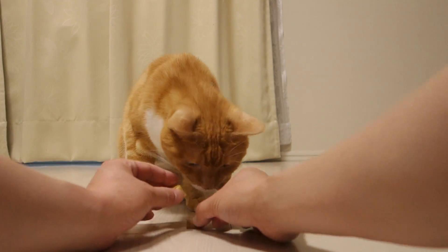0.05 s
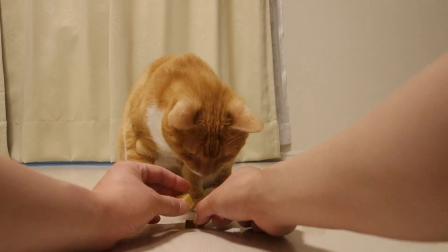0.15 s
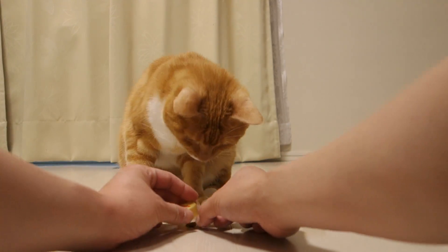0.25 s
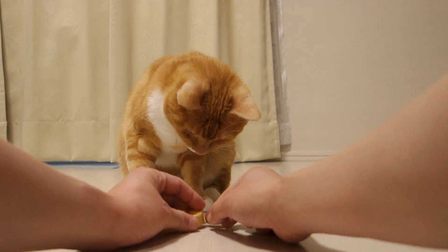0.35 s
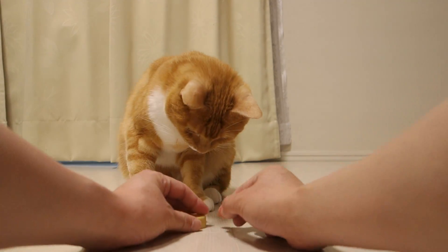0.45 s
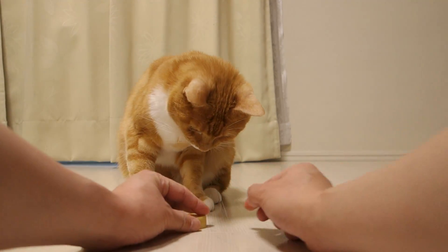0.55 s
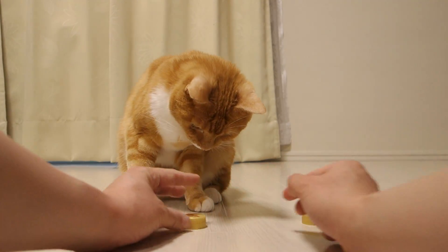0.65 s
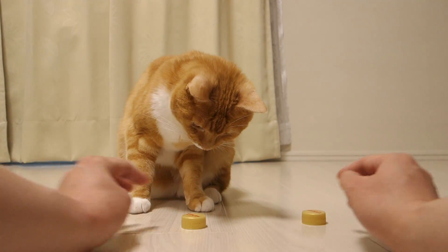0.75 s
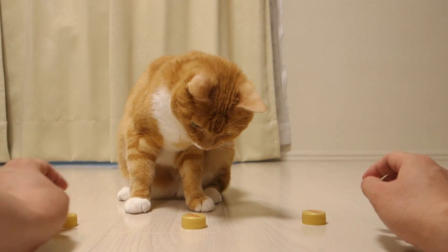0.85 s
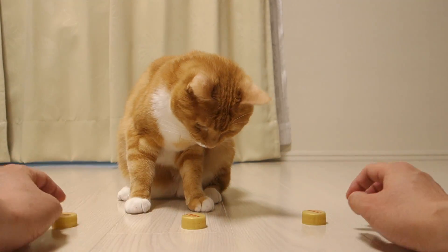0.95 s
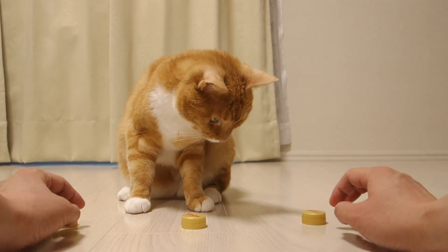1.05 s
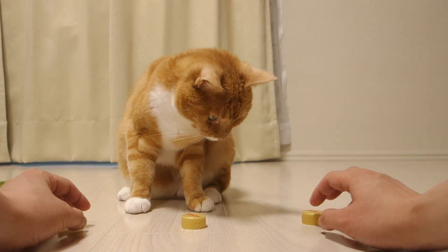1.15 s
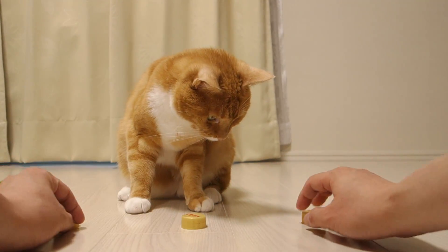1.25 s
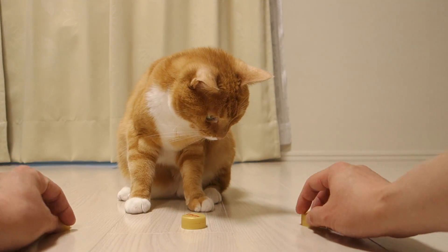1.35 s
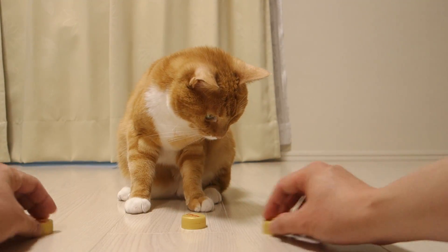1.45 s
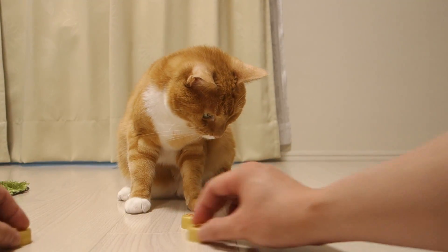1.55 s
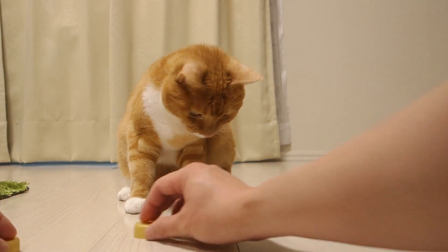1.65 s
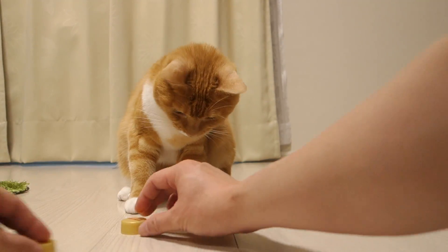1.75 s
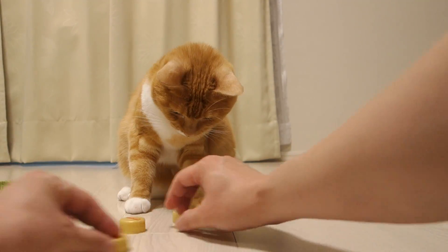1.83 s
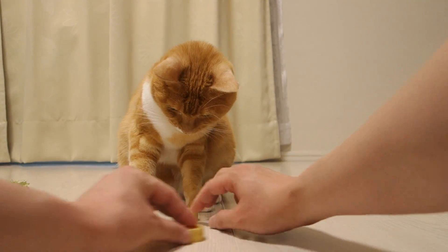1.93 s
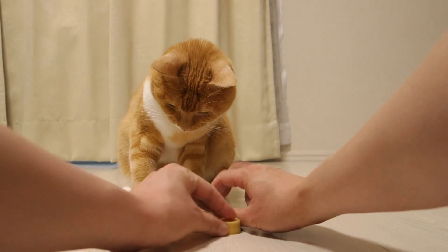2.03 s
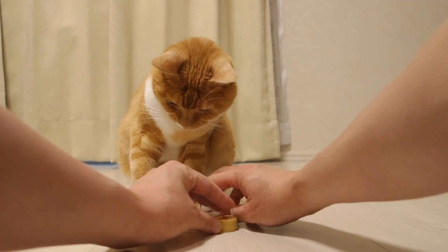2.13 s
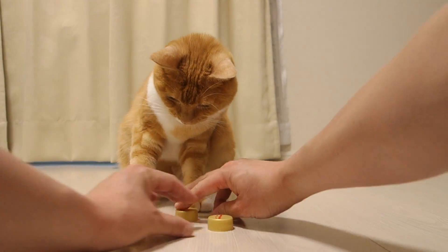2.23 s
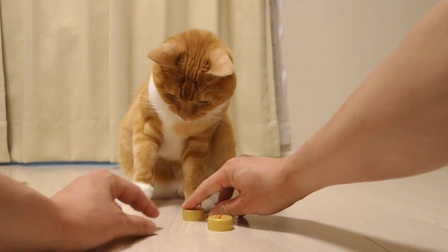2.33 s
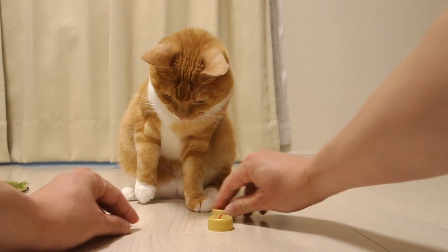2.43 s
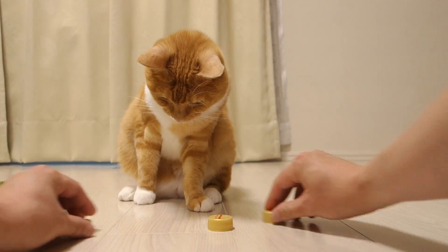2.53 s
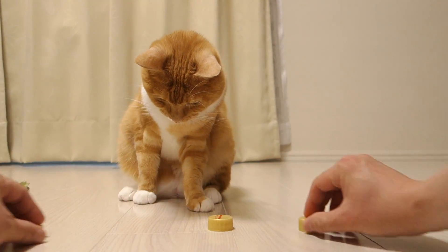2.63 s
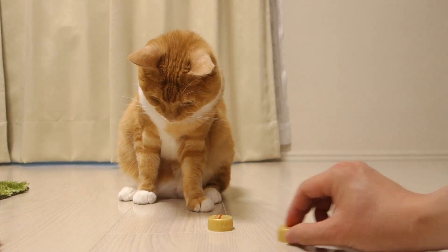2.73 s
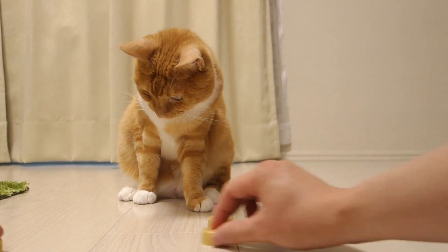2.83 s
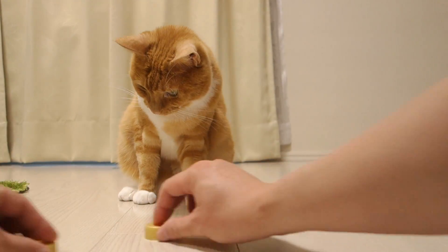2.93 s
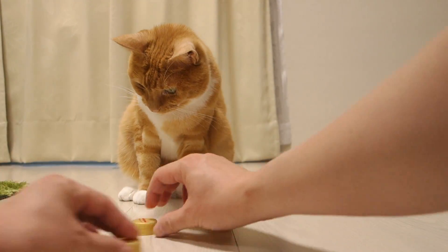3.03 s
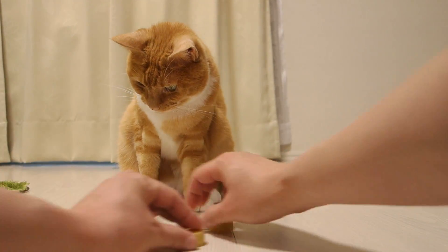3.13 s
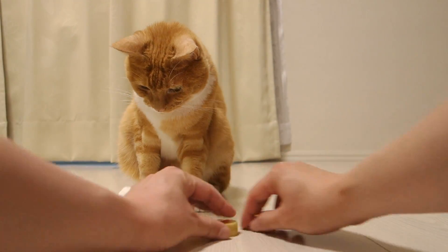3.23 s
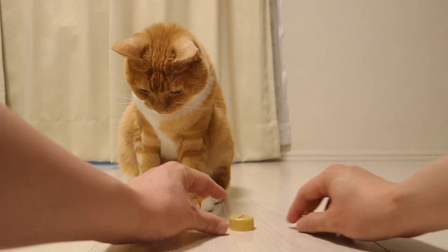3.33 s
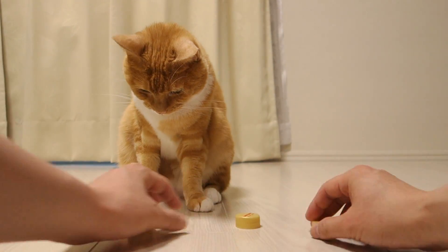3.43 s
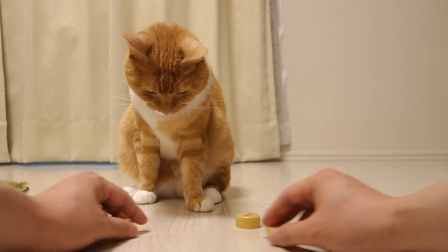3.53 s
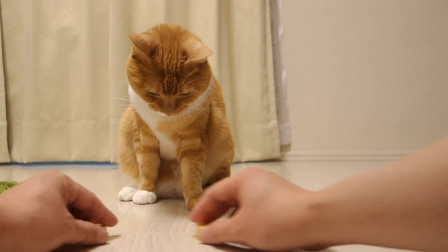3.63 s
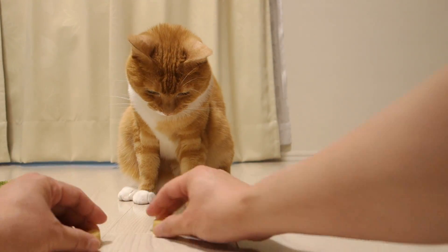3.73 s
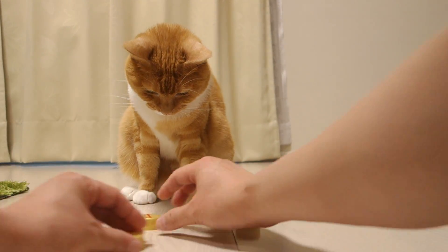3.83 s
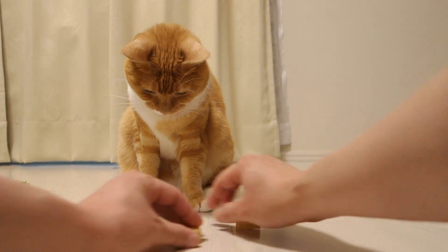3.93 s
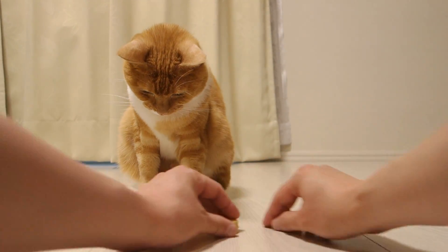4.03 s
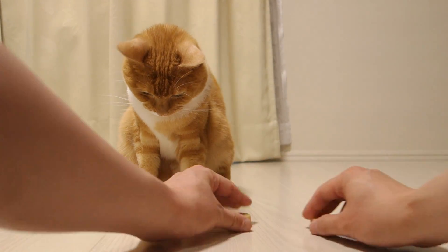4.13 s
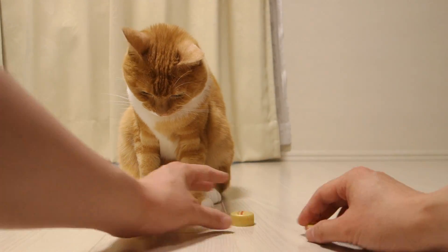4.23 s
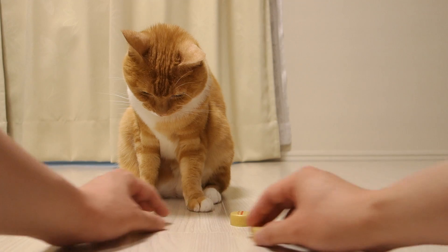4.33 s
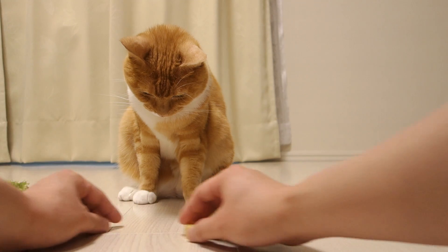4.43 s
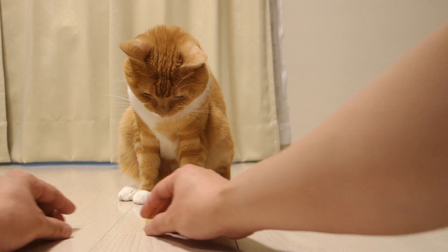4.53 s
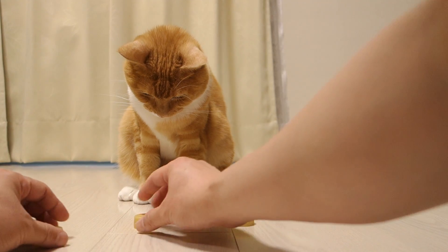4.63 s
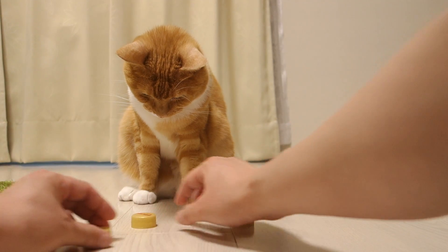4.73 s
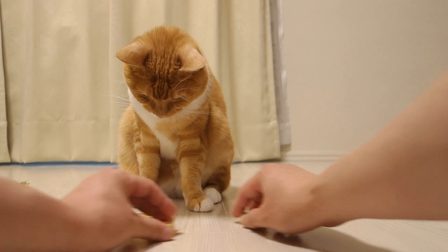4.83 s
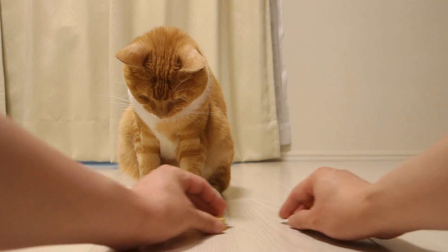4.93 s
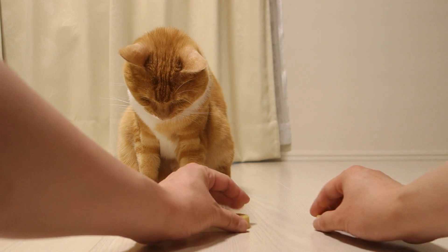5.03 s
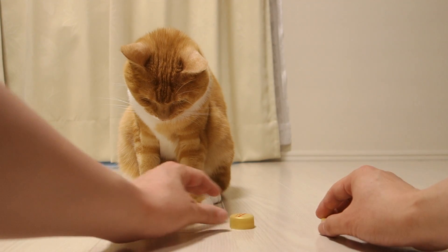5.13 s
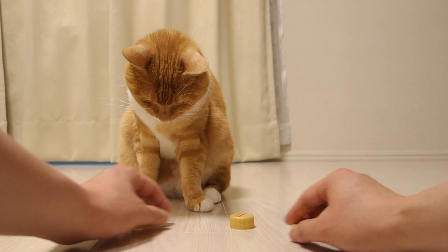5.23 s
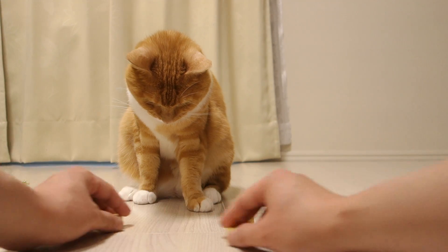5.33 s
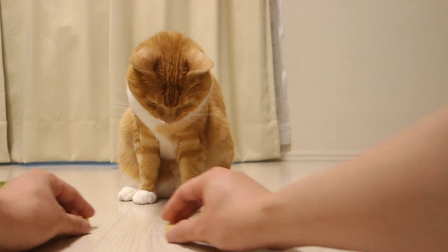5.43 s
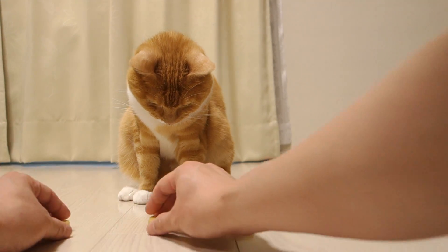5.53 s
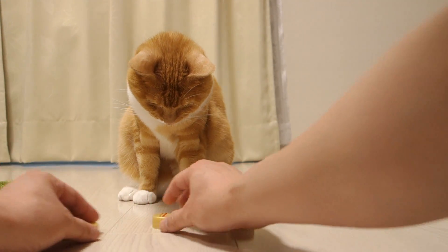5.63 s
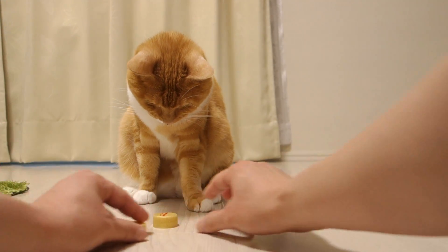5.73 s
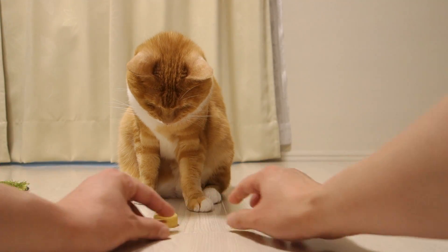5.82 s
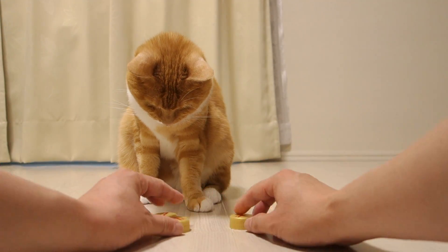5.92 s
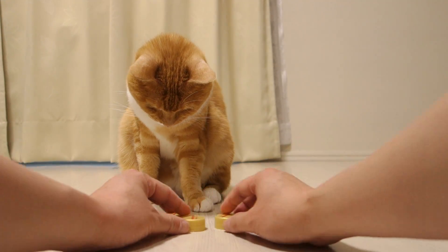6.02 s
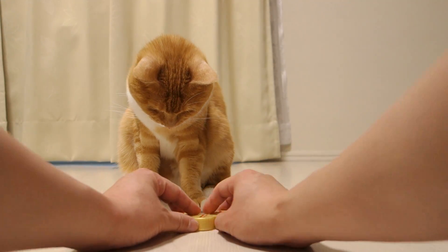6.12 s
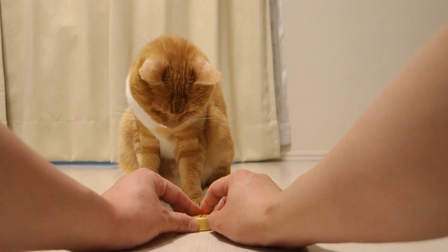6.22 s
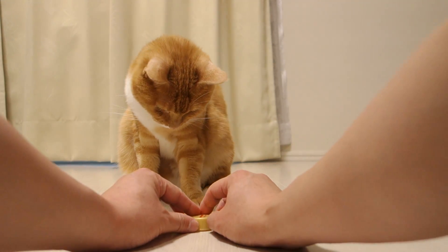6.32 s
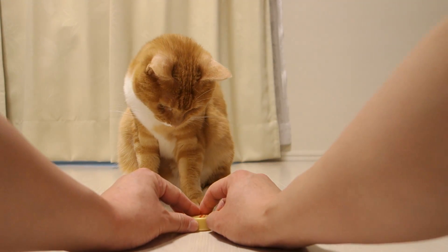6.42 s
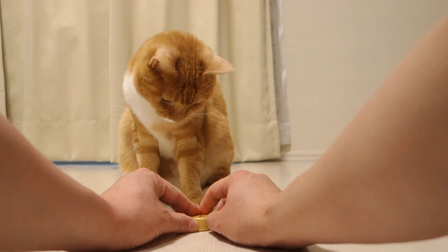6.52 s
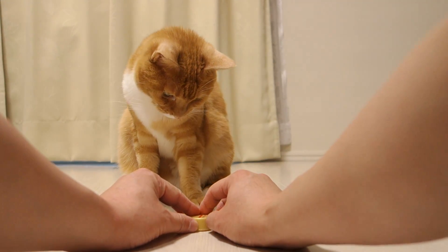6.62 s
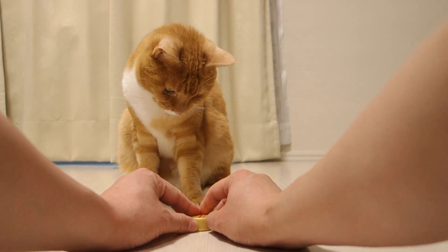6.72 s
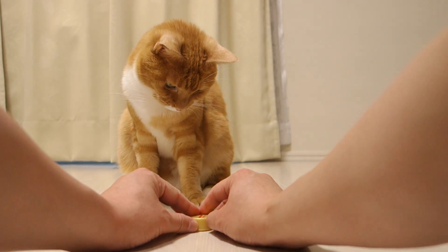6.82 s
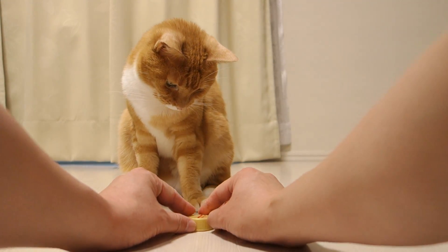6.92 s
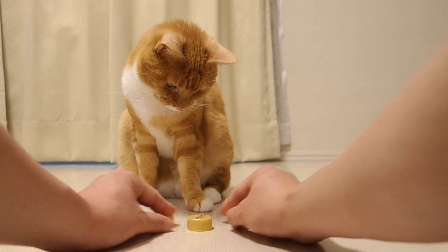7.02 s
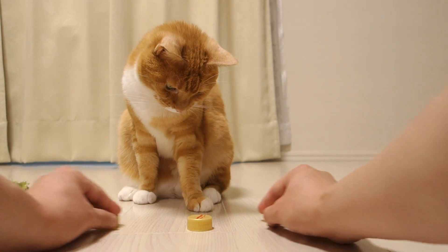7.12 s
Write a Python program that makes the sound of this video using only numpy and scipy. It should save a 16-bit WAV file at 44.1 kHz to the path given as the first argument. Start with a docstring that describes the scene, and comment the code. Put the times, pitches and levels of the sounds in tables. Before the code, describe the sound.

Close, slightly right of centre: plastic bottle caps rubbed over floorboards in quick back-and-forth strokes, each a gritty, nasal scrape that swells and fades, peppered with light knocks as caps catch or are set down. The opening is nearly silent, just tiny ticks and hand hiss; the shuffling then runs almost unbroken until a near pause before the end. Small room, short echoes, faint low engine drone far off.

```python
"""A small quiet room, microphone close: two hands shuffle three plastic bottle caps over a wooden floor.
First faint ticks and empty hands hissing over the boards; from 1.5 s friction rings the caps in strokes,
with ticks as they catch or are set down and dull bumps of the heel of a hand, until the last stroke at 7 s.
The fingers grip loosely, firmly from 2.35 s, lightly from 3.48 s. Each grip filters the friction noise.
Behind it all: filtered room noise, a sine hum, and a far two-sine engine drone that steps down near 2.6 s."""
import sys
import numpy as np
from scipy import signal
from scipy.fft import rfft, irfft, next_fast_len
from scipy.io import wavfile
from scipy.ndimage import uniform_filter1d

SR = 44100
rng = np.random.default_rng(int(sys.argv[2]) if len(sys.argv) > 2 else 0)


def waveform_to_disk(signal):
    """Save audio, clipped to [-1, 1], as 16-bit WAV at the path in sys.argv[1]."""
    frames = np.transpose(np.atleast_2d(signal))
    scaled = np.clip(frames, -1, 1) * 32767
    samples = np.round(scaled).astype(np.int16)
    wavfile.write(sys.argv[1], SR, samples)


N = 316197
T = np.arange(N) / SR

# Strokes of a cap pushed by a hand close to the microphone; the two hands overlap.
# Before small trims, level is the lower ring; bite (upper ring), weight (boards), hiss (skin) count against it.
# Columns: t/s, speeding up/s, slowing down/s, level/dB, bite/dB, weight/dB, hiss/dB, colour note f/Hz,
# lift or dip at that note/dB
CAP_STROKES = [(1.47, 0.19, 0.13, -27.5, -1, -17.5, -26.5, 1650.0, 3),
               (1.7, 0.097, 0.1, -29.5, -12, -16, -22, 1360, -2.5),
               (1.8, 0.2, 0.15, -26, 1.0, -21.5, -19.5, 2750.0, 1.5),
               (2.01, 0.15, 0.08, -30, -5.5, -14, -20.5, 1400.0, -0.5),
               (2.46, 0.18, 0.21, -34.5, 2, -14, -15.5, 3300.0, -3),
               (2.61, 0.19, 0.17, -30.5, -6, -18, -24, 1450, 14),
               (2.8, 0.17, 0.13, -25.5, 0, -20, -25, 3300.0, 0),
               (2.941, 0.13, 0.14, -24.5, -4, -23.5, -25.0, 1823, 0.5),
               (3.07, 0.11, 0.24, -28, 2, -19, -16.5, 1756, 5.5),
               (3.27, 0.089, 0.14, -26.0, -4.0, -17.5, -25, 1290, 4.5),
               (3.33, 0.11, 0.19, -31.5, -1, -15, -24.5, 2360, 8),
               (3.54, 0.18, 0.17, -31.5, -0.5, -13, -20, 2900.0, 6.5),
               (3.72, 0.14, 0.16, -40, -8.5, -19.5, -17, 1400.0, -2),
               (3.8, 0.27, 0.13, -30.5, -2.0, -14, -19.0, 2650.0, 6),
               (4.12, 0.04, 0.21, -27, -3.5, -17.5, -22.5, 1800.0, 4),
               (4.3, 0.18, 0.11, -30, -0.5, -21, -25.5, 3150.0, 10),
               (4.51, 0.049, 0.11, -28.5, 1.5, -14, -20.5, 2640, 4),
               (4.54, 0.11, 0.12, -29.5, -10.5, -17.5, -20.5, 1850.0, 5),
               (4.63, 0.27, 0.2, -33.5, -11.5, -25, -22.5, 1960, 7.5),
               (4.96, 0.06, 0.11, -23.5, -6.5, -24, -22.5, 1410, 1),
               (5.0, 0.098, 0.27, -34.5, -6.5, -16.0, -20, 1930, 3),
               (5.25, 0.25, 0.13, -27.5, -1.5, -23.0, -25.5, 3133, 7.5),
               (5.53, 0.03, 0.15, -24.5, -6, -17, -23.5, 1400.0, -2.5),
               (5.66, 0.14, 0.13, -31, -6.5, -12.5, -21.5, 1370, 6),
               (5.81, 0.03, 0.26, -29.5, -15, -20, -20, 1350.0, 6.0),
               (5.88, 0.27, 0.21, -39.5, -12, -13, -19, 1510, 7),
               (6.16, 0.038, 0.08, -28, -11, -17, -21, 1910, 6),
               (7.02, 0.18, 0.13, -37, -1.5, -12.5, -13.5, 1370.0, 13)]
# Resonances of the cap's hollow and wall under three finger grips: f/Hz, width/Hz, lift/dB
LOOSE_GRIP_RINGS = [(740, 260, 12.5), (1150, 88, 9.5), (1330, 190, 8), (1570, 150, 3), (1740, 130, 4.5),
                    (2635, 140, 6), (3740, 300, 2)]
FIRM_GRIP_RINGS = [(730.4, 185, 8.6), (1162, 83, 6.3), (1394, 380, 9.7), (1740, 170, 7.6), (2240, 100, 1.6),
                   (2720, 120, 3.8), (3470, 700, 3.2), (4600, 194, 2.5)]
LIGHT_GRIP_RINGS = [(726, 140, 9.5), (1170, 76.4, 3), (1390, 360, 11), (1755, 73, 6.7), (2090, 300, 0),
                    (2653, 97, 7.5), (3203, 160, 5), (3650, 480, 3.5), (4500, 230, 7), (5800, 370, 5),
                    (6144, 235, 11), (6850, 680, -4.5)]


def slides(skin_trim_db=-0.54, firm_from_s=2.35, light_from_s=3.48):
    """All cap strokes, with the fingers brushing along; one track for each grip."""
    grips = [LOOSE_GRIP_RINGS, FIRM_GRIP_RINGS, LIGHT_GRIP_RINGS]
    tracks = np.zeros((3, 2, N))
    for s, rise_s, fall_s, db, bite_db, weight_db, hiss_db, note_hz, lift_db in CAP_STROKES:
        held = np.searchsorted([firm_from_s, light_from_s], s)
        speed = hand_speed(rise_s, fall_s)
        scrape = slide(speed, grips[held], bite_db, weight_db, note_hz, lift_db)
        skin = amp(hiss_db + skin_trim_db) * brush(speed)
        add(tracks[held], s, amp(db) * (scrape + skin))
    return list(tracks)


def slide(speed, grip, bite_db, weight_db, note_hz, lift_db):
    """One stroke: rough friction rings the cap and boards, each voice growing as a power of hand speed."""
    rasp = friction(count=len(speed), per_s=4200, spread_db=3.0, smooth=0.67, judder_db=1.5, judder_hz=99)
    boom, lower, upper = cap_voices(stroke_colour(rasp, note_hz, lift_db), grip)
    rocking = amp(-0.36 * wander(42, count=len(speed)))  # rocking shifts the balance of the rings
    # the rings need speed; the boards sound even when slow
    lower_ring = amp(-0.3) * speed ** 2.76 * lower
    upper_ring = amp(-0.14 + bite_db) * speed ** 3.12 * rocking * upper
    boards = amp(2.0 + weight_db) * speed ** 1.88 * boom
    return lower_ring + upper_ring + boards


def hand_speed(rise_s, fall_s):
    """A hand speeds up and slows to rest along two quarter sines; 1 at its fastest."""
    t = np.arange(0, rise_s + fall_s, 1 / SR)
    ramp = np.interp(t, [0, rise_s, rise_s + fall_s], [0, 1, 0])
    return np.sin(np.pi / 2 * ramp)


# Left-right likeness of the sounds close to the microphone: f/Hz, coherence (0 to 1)
NEAR_COHERENCE = [(310, 1), (1410, 0.96), (3110, 0.79), (6810, 0.073), (15100, 0.137)]


def friction(count, per_s, spread_db, smooth, judder_db, judder_hz):
    """Tiny slips of uneven size over a smooth rub; judder swells and thins them in clumps."""
    happens = rng.random(count) < per_s / SR
    size = happens * amp(spread_db * np.minimum(rng.exponential(1, count), 3.5))
    slips = unit(size * rng.choice([-1., 1.], (2, count)))
    rub = smooth * rng.standard_normal((2, count))
    judder = amp(judder_db * wander(judder_hz, count=count))
    return pair((slips + rub) * judder, NEAR_COHERENCE)


def stroke_colour(drive, note_hz, lift_db, width_hz=520, patchy_db=3.0, patch_hz=260, patch_s=0.035):
    """Each stroke has one broad colour peak or dip; random patches in time and frequency make it drift."""
    hz, t, z = signal.stft(drive, SR, nperseg=512, noverlap=384)
    note_db = lift_db / (1 + (2 * (hz[:, None] - note_hz) / width_hz) ** 2)
    across_hz = (hz[:25, None] - hz[12]) / (patch_hz / 2)
    across_s = (t[:61] - t[30]) / (patch_s / 2)
    blur = np.exp(-across_hz ** 2 - across_s ** 2)
    patches = unit(signal.fftconvolve(rng.standard_normal(z.shape[1:]), blur, "same"))
    coloured = z * amp(note_db + patchy_db * patches)
    return signal.istft(coloured, SR, nperseg=512, noverlap=384)[1][:, :drive.shape[1]]


# Broad colour of a cap on the boards: f/Hz, level/dB
CAP_COLOUR = [(200, -30), (480, -18.5), (690, -8), (930, -11.5), (1130, -2.5), (1800, -0.5), (3000, -1),
              (4800, -9), (6300, -10.5), (7500, -18), (10000, -25), (15000, -63)]


def cap_voices(drive, grip):
    """Friction rings a gripped cap: boards, lower ring and upper ring, each scaled by the rms in its band."""
    def colour_db(f):
        peaks = sum(db / (1 + (2 * (f - hz) / width) ** 2) for hz, width, db in grip)
        return read(CAP_COLOUR, f) + peaks

    cap = ring(drive, colour_db)
    boom, rest = split(cap, 960)
    lower, upper = split(rest, 2350)
    bands_hz = [(500, 950), (1000, 2300), (2400, 6400)]
    return [voice / band(cap.mean(0), *edges).std() for voice, edges in zip([boom, lower, upper], bands_hz)]


# Colour of skin on the boards: f/Hz, level/dB
SKIN_COLOUR = [(400, -19.5), (900, -14), (1200, 5), (1800, -2.5), (2700, -2), (4100, -1.5), (4800, -2.5),
               (7400, 0), (11000, -4), (15800, -10.5)]


def brush(speed):
    """Skin on the boards: fine, dense friction with no ring, a wide hiss that follows the hand's speed."""
    rub = friction(count=len(speed), per_s=5100, spread_db=3.5, smooth=0.83, judder_db=0.9, judder_hz=62)
    hiss = ring(rub, lambda f: read(SKIN_COLOUR, f))
    return speed ** 1.77 * hiss / band(hiss.mean(0), 8000, 15000).std()


# Moments when a cap catches, knocks or is set down; brightness counts against the level, before a trim.
# Columns: t/s, level/dB, brightness/dB, chatter time/s
CAP_TICKS = [(0.077, -44.5, -24, 0.002), (0.1939, -41.5, -25, 0.02), (0.342, -48, -40, 0.002),
             (0.3941, -54.5, -3, 0.038), (0.5281, -26.5, -25, 0.0034), (0.552, -31, -21, 0.0048),
             (0.798, -43, -13, 0.00183), (1.225, -48, -14, 0.04), (1.429, -43, -28, 0.006),
             (1.6665, -17.5, -9.5, 0.019), (1.797, -25, -12, 0.005), (1.872, -27.5, -12, 0.002),
             (1.9973, -23, -4, 0.0052), (2.2824, -32.5, -30, 0.0043), (2.292, -32.5, -12, 0.0019),
             (2.4902, -40.5, -7, 0.0018), (3.157, -22, -12.5, 0.032), (3.257, -21, -11, 0.013),
             (3.3707, -15.5, -22, 0.0041), (3.5881, -40.5, -8, 0.0018), (3.677, -26.5, -4.5, 0.0036),
             (3.7552, -17.5, -7, 0.0028), (3.7824, -23, -10, 0.0066), (3.9098, -28, -14, 0.0033),
             (3.9323, -24, -30, 0.00195), (4.150, -22, -7, 0.019), (4.389, -38.5, -19, 0.002),
             (4.5348, -19, -12, 0.0023), (4.9944, -23, 0, 0.0043), (5.226, -32.5, -24.5, 0.0024),
             (5.342, -35, -17, 0.002), (5.5522, -26, -5.5, 0.0047), (5.719, -27.5, -20, 0.0019),
             (5.737, -28, -15, 0.0029), (5.76, -27, -8.5, 0.0024), (5.832, -25.5, -20, 0.003),
             (5.866, -22, -12, 0.007), (5.9461, -23, -10.5, 0.0031), (6.013, -30.5, -6, 0.0019),
             (6.156, -28.5, -9.5, 0.003), (6.204, -20.5, -12.5, 0.0044), (6.2807, -29.5, -6, 0.002),
             (6.7934, -32.5, 2.5, 0.002), (7.0868, -26.5, -12.5, 0.0035), (7.149, -24.5, -15, 0.003)]
# Colour of a sharp knock of plastic on wood: f/Hz, level/dB
KNOCK_COLOUR = [(200, -44), (600, -16.5), (920, -21), (1200, 1), (1500, 1.5), (2100, -3.5), (3000, -0.5),
                (4000, -3), (5400, -2), (6400, 2), (7500, -7.5), (11000, -18), (16000, -28)]


def ticks(treble_trim_db=-1, chatter=0.25, size=4096):
    """The rim strikes once and chatters on, ringing the cap's body and its bright edge."""
    out, t = np.zeros((2, N)), np.arange(size) / SR
    grits = rng.standard_normal((len(CAP_TICKS), 2, size))
    for (s, db, bright_db, chatter_s), grit in zip(CAP_TICKS, grits):
        force = chatter * grit * np.exp(-t / max(chatter_s, 1 / SR))
        force[0, 0] += 1  # the first strike
        soft_db = 0.5 * min(bright_db, 0)  # a long, soft contact cannot wake the wall's upper modes
        hard_db = max(bright_db + 10, 0)  # a hard one snaps in the top octave

        def colour_db(f):
            softened = soft_db / (1 + (3600 / (f + 1)) ** 10)
            hardened = hard_db / (1 + (7200 / (f + 1)) ** 10)
            return read(KNOCK_COLOUR, f) + softened + hardened

        knock = ring(pair(force, NEAR_COHERENCE), colour_db)
        body, edge = split(knock, 4800)
        bright_edge = amp(bright_db + treble_trim_db) * edge / strongest(edge)
        add(out, s, amp(db) * (body / strongest(body) + bright_edge))
    return out


def strongest(x):
    """The rms of a sound's loudest millisecond and a half."""
    return np.sqrt(uniform_filter1d(x.mean(0) ** 2, size=66).max())


# Sweeps of an empty hand over the boards, level before a trim:
# t/s, speeding up/s, slowing down/s, level/dB
HAND_SWISHES = [(0.0, 0.1, 0.3, -65), (0.44, 0.42, 0.072, -58.5), (0.759, 0.11, 0.33, -51.5),
                (1.33, 0.17, 0.05, -65), (2.29, 0.14, 0.14, -56.5)]


def swishes(trim_db=-1.5):
    """Empty hands drawn back over the floor: skin friction alone, shaped by hand speed."""
    out = np.zeros((2, N))
    for s, rise_s, fall_s, db in HAND_SWISHES:
        add(out, s, amp(db + trim_db) * brush(hand_speed(rise_s, fall_s)))
    return out


# Bumps of the heel of a hand on the floor: t/s, peak level/dB
HEEL_BUMPS = [(1.659, -60), (3.66, -45), (4.2, -57), (6.019, -53)]


def bumps(low_hz=66, high_hz=168, swell_s=0.0145):
    """Soft flesh gives the boards a dull, low push: band noise that swells and dies."""
    out, t = np.zeros((2, N)), np.arange(SR // 3) / SR
    for (s, db), noise in zip(HEEL_BUMPS, rng.standard_normal((len(HEEL_BUMPS), len(t)))):
        thud = band(noise, low_hz, high_hz) * t * np.exp(-t / swell_s)
        add(out, s, amp(db) * thud[None] / abs(thud).max())
    return out


# Time for the room's echoes to fall by 60 dB: f/Hz, t60/s
ECHO_DECAY = [(300, 0.55), (1300, 0.37), (4200, 0.38), (7500, 0.34), (14000, 0.38)]
# Left-right likeness of the echoes and the room noise: f/Hz, coherence (0 to 1)
ROOM_COHERENCE = [(30, .98), (105, .996), (260, 1), (510, 0.88), (1510, 0.63), (4100, 0.081), (12100, .06)]


def room(x, wet_db, first_s=0.0049):
    """Sparse echoes from walls and curtain, each band dying at its own speed."""
    count = SR // 2
    taps = rng.choice([-1., 1.], (2, count)) * (rng.random((2, count)) < 4000 / SR)
    hz, t, z = signal.stft(taps, SR, nperseg=256)
    decay_db = -60 * t / read(ECHO_DECAY, hz)[:, None]
    tail = signal.istft(z * amp(decay_db), SR, nperseg=256)[1]
    onset = np.clip(np.arange(tail.shape[1]) / SR / first_s - .5, 0, 1)  # a gap, then a quick ramp
    tail = pair(tail * onset, ROOM_COHERENCE)
    echoes = signal.fftconvolve(x, tail / np.linalg.norm(tail[0]), axes=1)[:, :N]
    return x + amp(wet_db) * echoes


# Colour of the room noise: f/Hz, level/dB
AIR_COLOUR = [(25, -40), (70, -16), (110, -9), (220, 0.5), (320, -4), (420, -7), (600, -12.5), (950, -18),
              (1300, -15), (1800, -16.5), (2600, -23), (4500, -26), (9000, -28), (15800, -32)]
# Second shaft order of a far engine, before and after a gear change: t/s, f/Hz, level/dB
ENGINE_BEFORE = [(0, 131.7, -63.5), (.9, 131.9, -64.5), (1.7, 127, -56.5), (1.9, 126, -69),
                 (2.25, 128.3, -57), (2.55, 125, -68)]
ENGINE_AFTER = [(2.6, 101.6, -65), (2.8, 102.2, -61.5), (3.25, 104, -68.5), (3.62, 102.5, -62),
                (3.9, 101.4, -64.5), (4.6, 97.6, -70), (5.8, 99.6, -70.5), (7.15, 100.6, -77)]


def background(air_db=-54.5, hum_hz=300.6, hum_db=-64.5):
    """Steady room noise, a sine hum wavering in level and the far engine."""
    noise = pair(rng.standard_normal((2, N)), ROOM_COHERENCE)
    air = unit(shape(noise, lambda f: amp(read(AIR_COLOUR, f))))
    hum = np.sqrt(2) * amp(hum_db + 1.5 * wander(4.1)) * np.sin(2 * np.pi * hum_hz * T)
    engine = drone(ENGINE_BEFORE, third_db=-32) + drone(ENGINE_AFTER, third_db=1.5)
    return amp(air_db) * air + hum + engine


def drone(rows, third_db):
    """Second and third shaft orders of a far engine, as two sines; the third wavers in level."""
    angle = 2 * np.pi * np.cumsum(follow(rows)) / SR
    third = amp(third_db + 3 * wander(1.5)) * np.sin(angle * 3 / 2)
    level = np.sqrt(2) * during(rows, fade_s=0.077) * amp(follow(rows, column=2))
    return level * (np.sin(angle) + third)


def follow(rows, column=1):
    """A curve's value at every sample."""
    rows = np.asarray(rows)
    return np.interp(T, rows[:, 0], rows[:, column])


def during(rows, fade_s):
    """1 while a curve lasts, with short fades."""
    return np.clip(np.minimum(T - rows[0][0], rows[-1][0] - T) / fade_s + .5, 0, 1)


def amp(db):
    """Decibels to gain."""
    return 10 ** (np.asarray(db) / 20)


def unit(x):
    """Scales to rms 1."""
    return x / np.sqrt(np.mean(x ** 2) + 1e-20)


def read(points, hz):
    """A table's value on a log-frequency axis."""
    f, value = np.transpose(points)
    return np.interp(np.log(hz + 1), np.log(f + 1), value)


def add(mix, s, sound):
    """Lays a sound into the mix at time s."""
    part = mix[:, max(round(s * SR), 0):][:, :sound.shape[1]]
    part += sound[:, :part.shape[1]]


def shape(x, gain):
    """Filters by a gain that is a function of frequency."""
    size = next_fast_len(x.shape[-1] + 2048)
    spectrum = rfft(x, size) * gain(np.fft.rfftfreq(size, 1 / SR))
    return irfft(spectrum, size)[..., :x.shape[-1]]


def band(x, lo_hz, hi_hz):
    """One band of a sound, with steep edges."""
    return shape(x, lambda f: 1 / np.sqrt((1 + (lo_hz / (f + 1)) ** 20) * (1 + (f / hi_hz) ** 20)))


def split(x, hz):
    """The parts of a sound below and above a frequency."""
    below = shape(x, lambda f: 1 / (1 + (f / hz) ** 10))
    return below, x - below


def ring(x, colour_db, size=2048):
    """Passes x through a causal (minimum-phase) body whose gain in dB is a function of frequency."""
    log_gain = np.log(amp(colour_db(abs(np.fft.fftfreq(size, 1 / SR)))))
    response = np.fft.ifft(np.exp(np.conj(signal.hilbert(log_gain)))).real
    return signal.oaconvolve(x, response[None, :size // 2], axes=1)[:, :x.shape[1]]


def pair(x, coherence):
    """Turns two signals into left and right, as mid and side weighted by a given likeness."""
    mid = shape(x[0], lambda f: np.sqrt((1 + np.clip(read(coherence, f), 0, 1)) / 2))
    side = shape(x[1], lambda f: np.sqrt((1 - np.clip(read(coherence, f), 0, 1)) / 2))
    return np.array([mid + side, mid - side])


def wander(rate_hz, count=N):
    """Slow chance of rms 1."""
    return unit(shape(rng.standard_normal(count), lambda f: 1 / (1 + (f / rate_hz) ** 4)))


# Stereo balance of the caps and hands: f/Hz, left minus right level/dB
NEAR_BALANCE = [(210, -3), (710, -1.1), (1310, -3.5), (2410, -5), (4410, -7.5), (8110, -2.5), (15100, -2.5)]


def scene():
    """Caps and hands lie a little to the right; each grip's track, swishes and ticks has its own echoes."""
    rubbed = sum(room(track, wet_db=-8.5) for track in slides() + [swishes()])
    left, right = rubbed + room(ticks(), wet_db=-7.0)
    left = shape(left, lambda f: amp(read(NEAR_BALANCE, f) / 2))
    right = shape(right, lambda f: amp(-read(NEAR_BALANCE, f) / 2))
    return np.array([left, right]) + bumps() + background()


def record(dry, edge_hz=15900):
    """The recorder's band limit: a steep low-pass."""
    lowpass = signal.firwin(511, edge_hz, window=("kaiser", 9), fs=SR)
    return signal.oaconvolve(dry, lowpass[None], "same")


dry = scene()
out = record(dry)
waveform_to_disk(out)
```